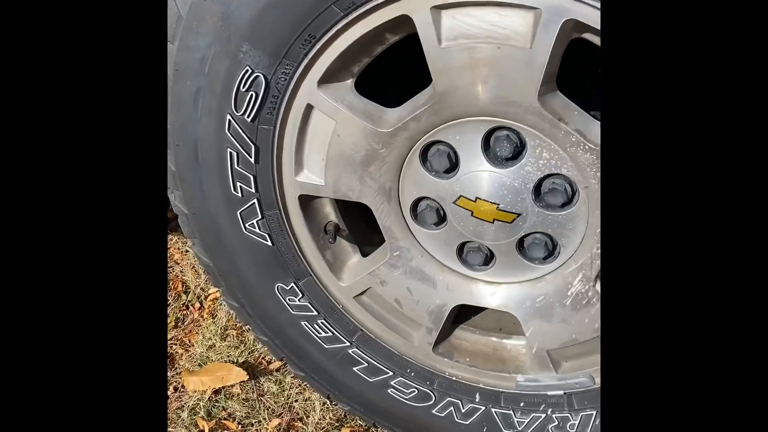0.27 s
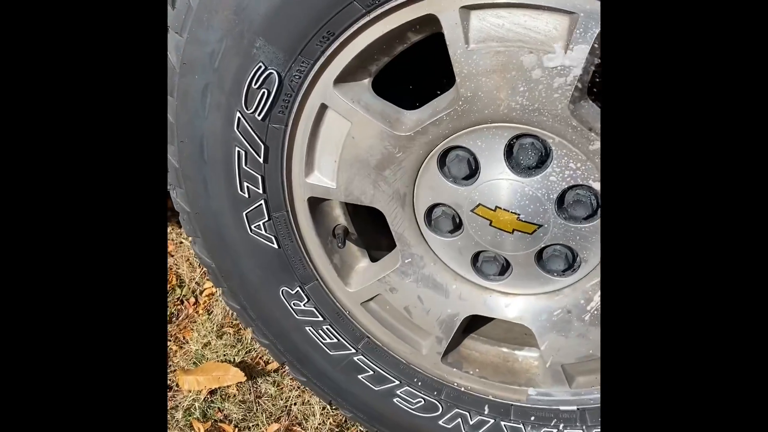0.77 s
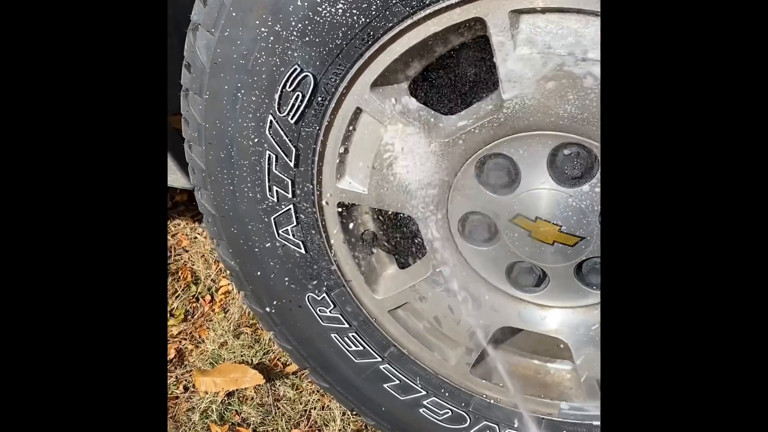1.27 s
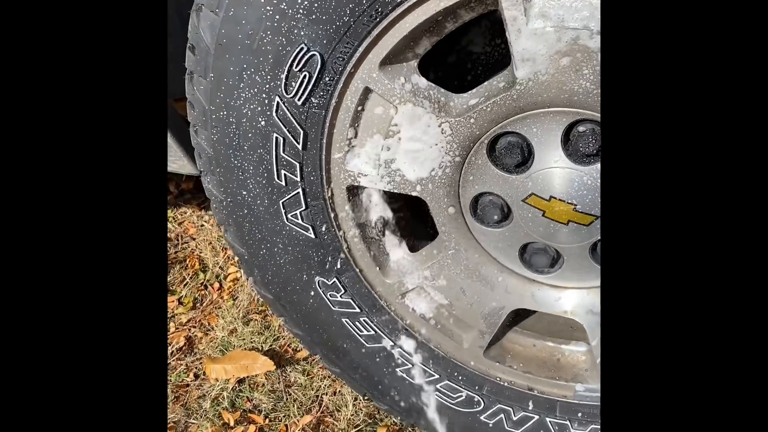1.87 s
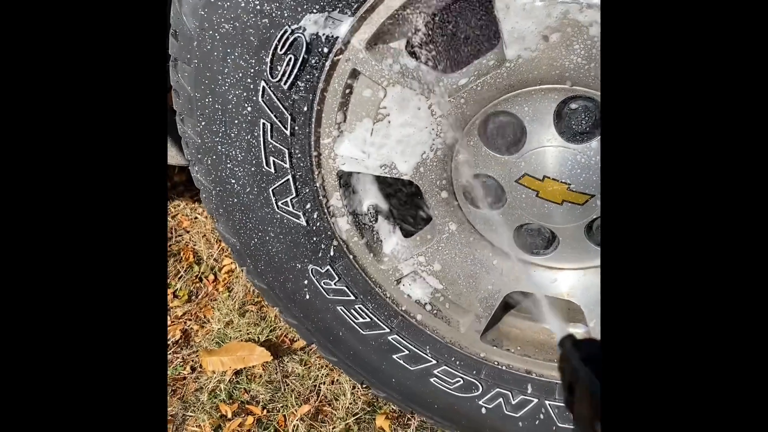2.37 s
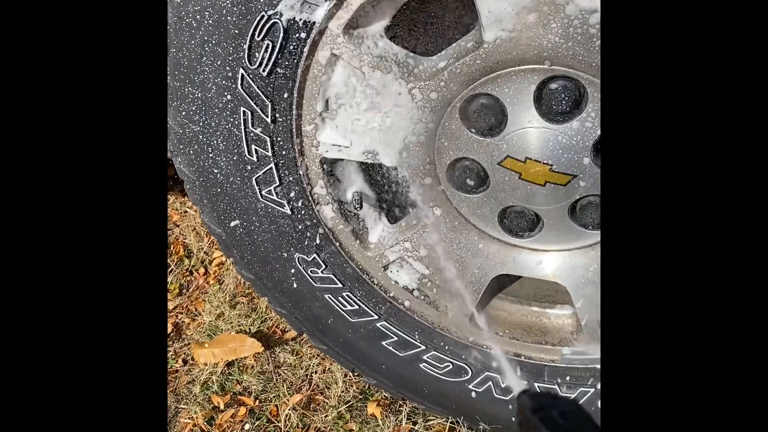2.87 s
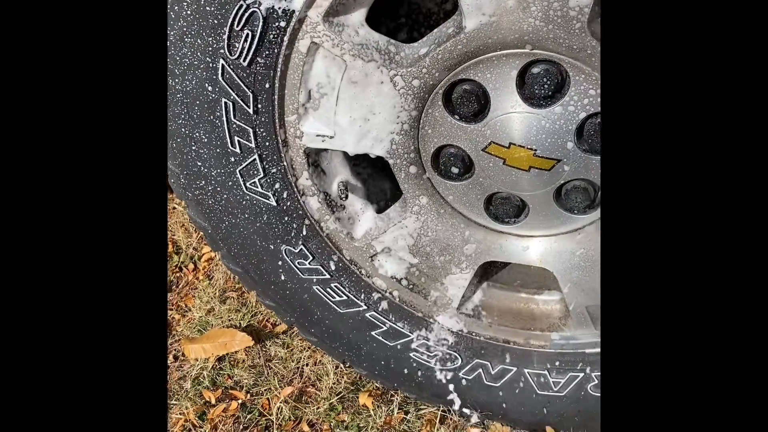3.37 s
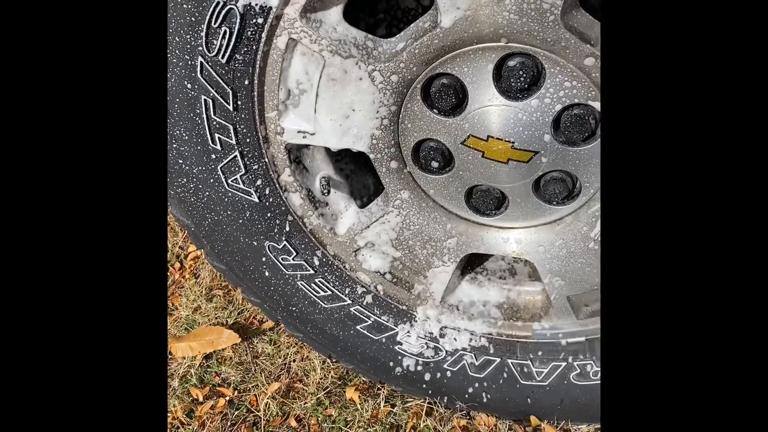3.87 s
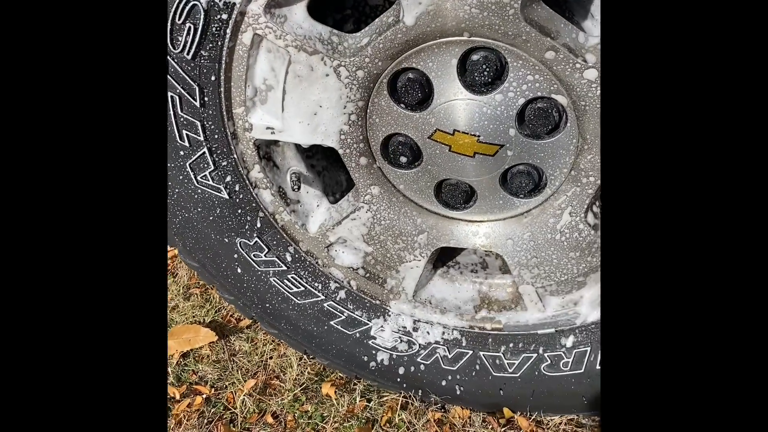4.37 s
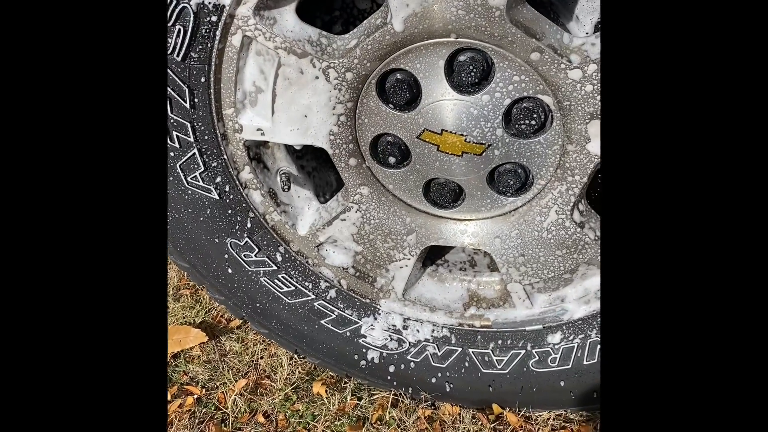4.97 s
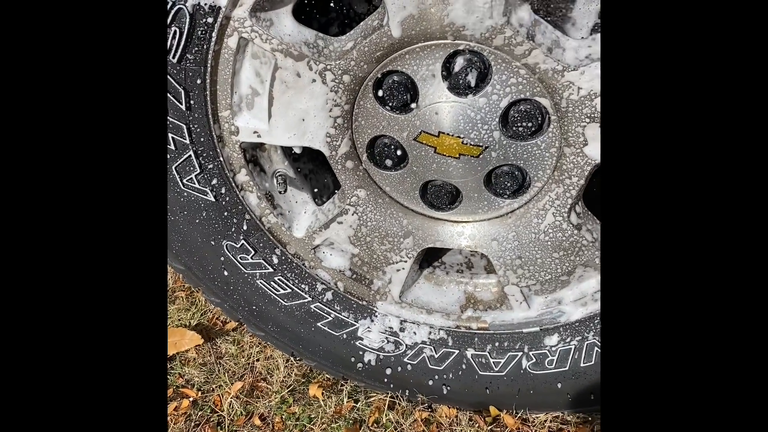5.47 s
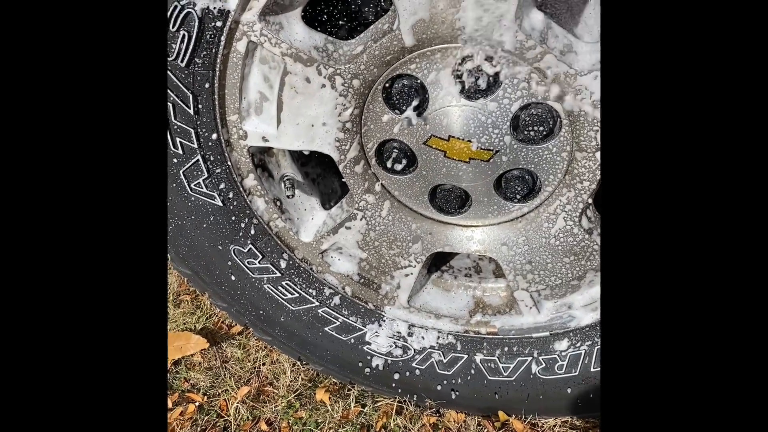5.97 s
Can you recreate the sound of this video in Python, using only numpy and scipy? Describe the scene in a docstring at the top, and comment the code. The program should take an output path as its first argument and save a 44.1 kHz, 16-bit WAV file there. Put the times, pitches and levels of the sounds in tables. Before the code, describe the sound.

Close, dry outdoor sound of a trigger spray bottle pumped at a car wheel for about 6.2 seconds. It opens already in a hiss, with wind puffs and low thumps bumping the microphone. From 0.2 s, squeezes follow steadily, about four per second: a hollow plastic clack, a few spat drops, a bright airy squirt lasting little more than a tenth of a second, then a light chattering rattle as the trigger springs back. Droplets patter on the wheel and single drops tick. The hiss is strongest around 1 s and 2.5 s. From about 3 s a distant vehicle rumble grows, with tyres singing faintly near 3.5 s, and deep surges between 4.5 and 5.5 s. Squirts soften somewhat around 5.3 s, turning more sizzly while the trigger rattles get clearer, then recover. At about 6.15 s the hand rubs the bottle with a short squeak.

```python
"""Outdoors on dry grass, microphone close: a trigger spray bottle squirts a car wheel about four times a second.
From the start the hiss swells with the finger's pressure, over air, wind puffs, low thumps and a far rumble.
Each later squeeze adds a plastic clack and a few spat drops; small rattles follow as the trigger returns.
Around three and a half seconds tyres sing faintly far off; the rumble, likely a distant vehicle, grows and surges.
At the end the hand rubs squeakily on the bottle. Noise makes hiss and wind, decaying sines ring the plastic."""
import sys
import numpy as np
from scipy import signal
from scipy.fft import rfft, irfft, next_fast_len
from scipy.io import wavfile

SR = 44100
rng = np.random.default_rng(int(sys.argv[2]) if len(sys.argv) > 2 else 0)


def inscribe(sig):
    """Save sig as 16-bit PCM at rate SR to the path in sys.argv[1].

    A 1-D sig is mono; a 2-D sig holds one channel per row.
    Samples are clipped to [-1, 1] before scaling.
    """
    pcm = np.round(np.clip(np.atleast_2d(sig).T, -1, 1) * 32767)
    wavfile.write(sys.argv[1], SR, pcm.astype(np.int16))


N = 274213
SIZE = next_fast_len(N, real=True)
TIME = np.arange(N) / SR
FREQ = np.arange(SIZE // 2 + 1) * SR / SIZE


def from_db(db):
    """Decibels to gain."""
    return 10 ** (np.asarray(db) / 20)


def rms_one(x):
    """Scale to unit rms."""
    return x / np.sqrt(np.mean(x ** 2) + 1e-20)


def in_time(rows):
    """Each column of a curve, at every sample."""
    s, *columns = np.transpose(rows)
    return [np.interp(TIME, s, column) for column in columns]


def over_freq(points):
    """A table joined on a log-frequency axis."""
    hz, value = np.transpose(points)
    return np.interp(np.log(FREQ + 1), np.log(hz), value)


def filtered(x, response):
    """Apply a gain given at every frequency."""
    return irfft(rfft(x, SIZE) * response, SIZE)[..., :N]


def band(x, low_hz, high_hz):
    """The part of a sound between two soft edges; neighbouring bands add up to the whole."""
    below_high = 1 / (1 + (FREQ / high_hz) ** 12)
    below_low = 1 / (1 + (FREQ / low_hz) ** 12)
    return filtered(x, below_high - below_low)


def drift(rate_hz):
    """Smooth random wandering of rms 1."""
    return rms_one(filtered(rng.standard_normal(N), 1 / (1 + (FREQ / rate_hz) ** 2)))


def noise(spectrum, likeness, grain_db=0):
    """Coloured stereo noise of rms 1; grain makes it a stream of unequal tiny impacts."""
    sizes = from_db(grain_db * np.minimum(rng.exponential(1, N), 6))
    mid, side = rfft(rng.standard_normal((2, N)) * sizes, SIZE)
    alike = np.clip(over_freq(likeness), -1, 1)
    pair = np.sqrt(1 + alike) * mid + np.sqrt(1 - alike) * side * [[1], [-1]]
    low_hz, high_hz = spectrum[0][0], spectrum[-1][0]
    edges = np.minimum(FREQ / low_hz, 1) ** 3 / np.maximum(FREQ / high_hz, 1) ** 3
    colour = from_db(over_freq(spectrum))
    return rms_one(irfft(pair * edges * colour, SIZE)[:, :N])


def swells(rows):
    """A bell-shaped gain for each short event."""
    return sum(from_db(db) * np.exp(-2 * ((TIME - s) / length_s) ** 2) for s, length_s, db in rows)


def step(t, rise_s):
    """A smooth step from 0 to 1, halfway at time zero."""
    return .5 + .5 * np.tanh(t / (2 * rise_s))


def taps(times, level_db):
    """One impulse per contact."""
    out = np.zeros(N)
    out[np.round(times * SR).astype(int)] = from_db(level_db)
    return out


def dying(hits, t60, rise_s=0.00016):
    """Each impulse starts a quick rise and an exponential decay."""
    rise = np.exp(-1 / (rise_s * SR))
    decay = from_db(-60 / (t60 * SR))
    return signal.lfilter([1 - rise], np.convolve([1, -rise], [1, -decay]), hits + 1e-18)


# sound from the bottle reaches the left port first: pitch_hz, lead_rad
BOTTLE_PHASE = [(0,0),(2300,0),(3100,2),(4300,1.2),(5500,.8),(6400,2.7),(7200,3.14),(8100,3.4),(9800,6.2),(11400,6.5),(12700,9.35),(14300,9.5),(15300,11.7),(16500,12.4)]


def from_bottle(pair):
    """The two microphone ports hear the bottle's treble out of step."""
    phase = np.interp(FREQ, *np.transpose(BOTTLE_PHASE))
    return np.array([filtered(pair[0], np.exp(1j * phase)), pair[1]])


# every squirt: the valve opens, the pressure arches with the finger, the valve shuts, a thin mist dies away
VALVE_LEAD_S, VALVE_S, BUILD_S, HALF_FLOW_INSET_S = 0.013, 0.0024, 0.0095, 0.006
ARCH_DB, MIST_DB, MIST_FALL_DB_PER_S = 2.5, -21.5, 130


def squirt(start_s, length_s, shut_s, lean_db):
    """The valve cracks open, the jet builds, leans with the finger and collapses into mist."""
    t = TIME - start_s
    opened = step(t + VALVE_LEAD_S, VALVE_S) * step(t - HALF_FLOW_INSET_S, BUILD_S)
    shut = step(t - length_s + HALF_FLOW_INSET_S, shut_s)
    travel = np.clip(2 * t / length_s - 1, -1, 1)
    pressure = from_db(lean_db * travel - ARCH_DB * travel ** 2)
    mist = from_db(MIST_DB - MIST_FALL_DB_PER_S * np.maximum(t - length_s, 0))
    return opened * ((1 - shut) * pressure + shut * mist)


def off_the_wheel(pair, echo_db=-9, delay_s=0.0026, sway_s=0.00051, sway_hz=2.34):
    """The wheel echoes the hiss; the path wanders at random as the hand moves, so the colour shifts."""
    earlier = TIME - delay_s - sway_s * drift(sway_hz)
    echo = np.array([np.interp(earlier, TIME, side) for side in pair])
    return pair + from_db(echo_db) * echo


# squeezes of the trigger, levels before each layer's own gain:
# clack_s, jet_delay_s (after the clack), jet_length_s, collapse_s, hiss_db, lean_db (towards the end),
# body_db (hollow bottle), crack_db (sharp crack), body_hz, crack_hz
STROKES = [(-0.045, 0.00016, 0.16, 0.0053, -26, -0.5, -19.5, -30, 1125, 2200),
           (0.2115, 0.003, 0.14, 0.0085, -24, 2, -37, -46, 1125, 1490),
           (0.4735, -0.0082, 0.13, 0.0093, -23.5, 0, -38, -36.5, 1380, 1740),
           (0.6768, 0.02, 0.13, 0.0062, -22.5, -2.5, -27.5, -30.5, 1120, 2170),
           (0.9141, 0.014, 0.12, 0.0059, -21.5, -1, -23.5, -29.5, 1145, 2120),
           (1.127, 0.022, 0.13, 0.01, -22.5, -3, -26.5, -27.5, 1124, 2050),
           (1.358, 0.019, 0.12, 0.011, -24, -4, -21.5, -32.5, 1140, 1820),
           (1.569, 0.019, 0.13, 0.0045, -25, -0.5, -25.5, -34, 1120, 2000),
           (1.802, 0.018, 0.12, 0.011, -23, 2, -26.5, -32.5, 1115, 2070),
           (2.032, 0.02, 0.13, 0.0029, -23.5, -2, -29.5, -37, 1140, 2200),
           (2.254, 0.013, 0.14, 0.0096, -23.5, 1, -23.5, -29, 1124, 2430),
           (2.5162, -0.0098, 0.12, 0.015, -20.5, 2.5, -40, -33.5, 1220, 2070),
           (2.729, 0.018, 0.14, 0.008, -22.5, -1, -22.5, -33.5, 1110, 2400),
           (2.967, 0.0047, 0.11, 0.016, -23, 3.5, -46, -37, 1120, 2180),
           (3.192, 0.015, 0.13, 0.0068, -26, -1, -30.5, -33, 1115, 2210),
           (3.41, 0.012, 0.14, 0.01, -26, 1, -28.5, -35, 1090, 2480),
           (3.653, 0.013, 0.13, 0.01, -26.5, 1, -28, -31.5, 1130, 2420),
           (3.876, 0.017, 0.12, 0.015, -24.5, 1, -29, -31, 1160, 2280),
           (4.105, 0.005, 0.098, 0.023, -24.5, 7.5, -28.5, -32.5, 1180, 2590),
           (4.3402, 0.017, 0.14, 0.0073, -24.5, -2.5, -28.5, -33.5, 1180, 2320),
           (4.616, -0.0098, 0.14, 0.0056, -25.5, 0.5, -33, -37, 1130, 2040),
           (4.836, 0.016, 0.14, 0.0083, -26, -1.5, -24, -33, 1160, 2410),
           (5.087, 0.015, 0.14, 0.0043, -27, -1.5, -25, -30, 1103, 2200),
           (5.321, 0.02, 0.13, 0.0032, -29, -4, -27, -29.5, 1140, 2230),
           (5.5443, 0.02, 0.14, 0.015, -29.5, 1.5, -29, -32.5, 1120, 2180),
           (5.794, 0.024, 0.14, 0.0081, -26, -3.5, -23, -34, 1170, 2370),
           (6.042, 0.014, 0.14, 0.012, -24.5, 1.5, -27.5, -30.5, 1150, 2460)]
# colour of the nozzle hiss: pitch_hz, density_db (per Hz)
JET = [(700,-30),(1500,-20),(2800,-15),(4000,-11),(5000,-6.8),(6200,-4.6),(6700,-2.5),(7300,-3.7),(8300,-1),(9200,0),(10000,-1.8),(11000,-4.7),(12500,-3.7),(14300,-4.8),(15600,-3)]
# stereo likeness of the hiss: pitch_hz, left_right_likeness
JET_LIKENESS = [(2000,.7),(3500,.3),(4700,.4),(6000,.75),(7000,.98),(7800,.98),(8800,.8),(10500,.92),(12000,.8),(13000,.98),(14200,.98),(15500,.75)]
# the hiss changes colour as the nozzle is aimed about: time_s, lower_hiss_db, top_sizzle_db
AIM = [(0,-3,-0.5), (2.2,-1.5,-1.5), (3.6,-1.5,-1), (4.3,-5.5,-0.5), (5.1,0,-1), (5.4,6.5,6), (6.2,3,-0.5)]
# coarse blobs of foam splatter on the rim and the tyre: time_s, level_db (within the flow)
SPLATTER = [(0,-19), (0.6,-26), (1.3,-24.5), (2.2,-22.5), (3.3,-18.5), (4.2,-19), (5.1,-28), (5.4,-28),
            (6.2,-34)]
# colour of the splatter: pitch_hz, density_db (per Hz)
SPLATTER_COLOUR = [(1800,-1.5), (2700,-3), (3400,-5), (3850,4), (4400,-7)]
# colour of drops landing on the wheel: pitch_hz, density_db (per Hz)
SPLASH = [(500,-11),(1100,25.5),(2300,16.5),(4000,19.5),(5700,35.5),(7500,-29),(10000,15),(16000,-9)]
# stereo likeness of open air, shared by splashes and the far road: pitch_hz, left_right_likeness
AIR_LIKENESS = [(60,1),(200,0.99),(400,0.8),(700,0.033),(1200,0.19),(1900,0.84),(3000,0.0097),(16000,0.04)]


def spray(jet_db=1, flutter_db=0.35, splutter_db=1.85, splash_db=-21, flight_s=0.0047, splash_growth=0.32):
    """Pressure drives a hiss that splutters as the jet breaks up; drops patter on the wheel a moment later."""
    flow = sum(from_db(hiss_db) * squirt(s + delay_s, length_s, shut_s, lean_db)
               for s, delay_s, length_s, shut_s, hiss_db, lean_db, *_ in STROKES)
    hiss = off_the_wheel(from_bottle(noise(JET, JET_LIKENESS, grain_db=1.5)))
    lower_db, top_db = in_time(AIM)
    parts = [(1, 5500, lower_db), (5500, 11000, 0), (11000, SR, top_db)]
    # each band splutters on its own
    hiss = sum(band(hiss, low_hz, high_hz) * from_db(db + splutter_db * drift(25))
               for low_hz, high_hz, db in parts)
    jet = flow * from_db(jet_db + flutter_db * drift(200)) * hiss

    splatter_db, = in_time(SPLATTER)
    splatter_gain = from_db(splatter_db + 1.15 * drift(69))
    splatter = flow * splatter_gain * noise(SPLATTER_COLOUR, AIR_LIKENESS, grain_db=6.5)

    # the pattering follows the flow late, with its swells flattened
    landing = np.interp(TIME - flight_s, TIME, flow / flow.max()) ** splash_growth * flow.max()
    clumps = from_db(1.7 * drift(31))   # foam arrives in uneven blobs
    patter = from_db(splash_db) * landing * clumps * noise(SPLASH, AIR_LIKENESS, grain_db=6.5)
    return jet + splatter + patter


ENGINE_HZ, ENGINE_DB = 66.2, -7.5   # mean firing tone; mean level against the deep rumble


def engine_hum(waver_hz=1.58, waver_rate=4, throb_db=2, throb_rate=7):
    """The firing tone of the engine, unsteady in pitch and strength."""
    turn = 2 * np.pi * np.cumsum(ENGINE_HZ + waver_hz * drift(waver_rate)) / SR
    return from_db(ENGINE_DB + throb_db * drift(throb_rate)) * rms_one(np.sin(turn))


# tyres sing on the far road, their pitch rising a little and then sinking: time_s, pitch_hz, level_db
TYRE_SONG = [(2.85,1540,-70), (3.12,1535,-48), (3.27,1590,-47.5), (3.53,1602,-44.5), (3.68,1585,-51.5),
             (3.88,1490,-46.5), (4.2,1470,-55), (4.7,1406,-67)]


def tyre_song(width_hz=60, waver_hz=20, waver_db=2, waver_rate=9):
    """A narrow band of noise that follows the pitch of the tread and wavers on its way through the air."""
    hz, level_db = in_time(TYRE_SONG)
    turn = 2 * np.pi * np.cumsum(hz + waver_hz * drift(waver_rate)) / SR
    gain = from_db(level_db + waver_db * drift(waver_rate))
    return gain * (drift(width_hz) * np.cos(turn) + drift(width_hz) * np.sin(turn))


# the distant vehicle draws near, levels before the trims below: time_s, deep_db, upper_db, growl_db
APPROACH = [(0,-36.5,-38,-31.5), (1.6,-36.5,-40.5,-37), (2.5,-34,-38.5,-36.5), (2.75,-36,-41,-44),
            (2.92,-31.5,-35,-46), (3.2,-29,-29.5,-43), (3.8,-29,-27.5,-40), (4.05,-29,-30.5,-35.5),
            (4.6,-24.5,-29,-27.5), (5.3,-25.5,-30,-29), (5.7,-27.5,-35,-27), (6.22,-27,-34.5,-32.5)]
# colour of the deep rumble, and of the thud in the low swells: pitch_hz, density_db (per Hz)
DEEP = [(22,-36),(32,-25),(45,-5),(57,0),(66,1),(76,-0.5),(100,0),(125,-11.5)]
# colour of the upper rumble and growl: pitch_hz, density_db (per Hz)
UPPER = [(80,-2.5),(115,1),(170,-5.5),(240,-10.5),(340,-22.5),(600,-34.5)]
# far road hiss: time_s, level_db
ROAD = [(0,-52),(2.8,-43.5),(3.2,-42.5),(3.6,-40),(4.1,-40),(4.6,-43.5),(6.2,-53.5)]
# colour of the road hiss: pitch_hz, density_db (per Hz)
ROAD_COLOUR = [(450,2),(650,7),(850,3.5),(970,7),(1150,8),(1360,3),(1480,5),(1800,-1.5),(2600,-2.5),(4000,-4.5)]
RUMBLE_SWAY_DB, RUMBLE_SWAY_HZ = 1.45, 31   # the rumble rises and sinks at random


def vehicle(deep_db=-1.35, upper_db=-1.0, split_hz=210):
    """Engine rumble whose bands swell on their own curves, with a faint hiss and whine of tyres, far off."""
    deep, upper, growl = (level + RUMBLE_SWAY_DB * drift(RUMBLE_SWAY_HZ) for level in in_time(APPROACH))
    road_db, = in_time(ROAD)
    body = from_db(upper_db) * noise(UPPER, AIR_LIKENESS)
    body = from_db(upper) * band(body, 1, split_hz) + from_db(growl) * band(body, split_hz, SR)
    rumble = from_db(deep + deep_db) * (noise(DEEP, AIR_LIKENESS) + engine_hum()) + body
    road = from_db(road_db) * noise(ROAD_COLOUR, AIR_LIKENESS)
    return rumble + road + tyre_song()


# colour of the open air: pitch_hz, density_db (per Hz)
AIR = [(100,8),(300,4.5),(500,-0.5),(700,0.5),(950,2.5),(1400,-7.5),(2000,-9),(3500,-14),(7000,-41),(16000,-19)]
# short low swells, wind puffs early and surges of the rumble later: centre_s, length_s, flutter_db, thud_db
LOW_SWELLS = [(0.071,0.033,-29.5,-23), (0.133,0.029,-32,-25.5), (0.24,0.02,-38,-28),
              (0.336,0.016,-29.5,-28), (0.807,0.04,-30.5,-30), (1,0.02,-29.5,-24), (1.054,0.026,-27.5,-39),
              (1.097,0.022,-26.5,-48), (1.278,0.034,-33,-28.5), (2.511,0.033,-32.5,-42),
              (2.671,0.024,-29.5,-33), (3.765,0.026,-38,-22), (4.2,0.071,-44,-25), (4.288,0.03,-29,-40),
              (4.485,0.056,-40,-23), (4.628,0.032,-36,-26), (5.12,0.04,-34,-24), (5.669,0.025,-42,-20)]
# colour of the flutter: pitch_hz, density_db (per Hz)
FLUTTER_COLOUR = [(45,3),(130,3),(200,5),(330,-4),(470,-8.5),(800,-23)]
# stereo likeness of the low swells: pitch_hz, left_right_likeness
SWELL_LIKENESS = [(40,1),(150,0.87),(500,0.96)]


def outdoors(air_db=-42):
    """Steady air, and short low swells of noise: wind puffs early, surges of the rumble later."""
    air = from_db(air_db) * noise(AIR, AIR_LIKENESS)
    flutter_gain = swells([(s, length_s, db) for s, length_s, db, _ in LOW_SWELLS])
    thud_gain = swells([(s, length_s, db) for s, length_s, _, db in LOW_SWELLS])
    flutter = flutter_gain * noise(FLUTTER_COLOUR, SWELL_LIKENESS)
    thud = thud_gain * noise(DEEP, SWELL_LIKENESS)
    return air + flutter + thud


# short low thumps: jolts at the microphone, the clack's recoil, and late heaves of the rumble:
# centre_s, pitch_hz, peak_db
THUMPS = [(.0065,147,-18), (0.042,130,-21.5), (0.0706,174,-12.5), (0.0759,200,-19.5), (0.09,79.4,-17.5),
          (0.1411,260,-25.5), (0.156,280,-27), (0.2297,110,-24.5), (.241,190,-26), (0.329,110,-28),
          (0.3444,260,-21), (0.359,80,-23), (0.7868,169,-22), (0.805,119,-21), (0.916,87.5,-19.5),
          (0.9908,217,-18), (1.037,129,-18.5), (1.0845,300,-23), (1.1027,220,-20.5), (1.276,298,-22.5),
          (1.938,85,-18), (2.6714,248,-22), (4.636,100,-30), (5.115,65,-10), (5.371,78,-11), (5.446,68,-12)]


def thumps():
    """Each thump is a single low pulse with a smaller swing the other way on either side."""
    out = np.zeros(N)
    for s, hz, db in THUMPS:
        u = (np.pi * hz * (TIME - s)) ** 2
        out -= from_db(db) * (1 - 2 * u) * np.exp(-np.minimum(u, 50))
    return out


# single bright ticks of drops, between and during squirts: start_s, level_db
DROPS = [(0.139,-30),(0.209,-32),(.473,-33),(0.845,-29),(0.924,-28),(1.131,-30),(1.545,-31),(2.039,-23.5),(2.668,-23),(3.362,-26),(3.59,-23),(3.603,-26),(3.822,-25.5),(4.273,-24),(4.777,-28),(5.111,-24),(5.3212,-26),(5.335,-28)]
# wisps that leak ahead of a squirt: centre_s, length_s, level_db
WISPS = [(.428,0.044,-41.5),(2.475,0.052,-39.5),(3.172,0.026,-36),(4.575,0.037,-46.5),(6.02,0.038,-42)]
# colour of drops and wisps: pitch_hz, density_db (per Hz)
DRIBBLE = [(1200,-6),(2500,4),(5000,13),(9500,11.5),(15000,-8)]


def dribble(drop_t60=0.012, rough_db=3):
    """Single drops tick brightly, and ragged wisps leak from the nozzle as the finger takes up the slack."""
    s, db = np.transpose(DROPS)
    drops = dying(taps(s, db), drop_t60)
    wisps = swells(WISPS) * from_db(rough_db * drift(150))
    return (drops + wisps) * from_bottle(noise(DRIBBLE, JET_LIKENESS, grain_db=6.0))


def clacks():
    """Time, body level, crack level, body pitch and crack pitch of the squeezes after time zero."""
    columns = np.transpose([row for row in STROKES if row[0] > 0])
    return columns[0], *columns[-4:]


def ringing(table, times, levels, pitches, detune, build_cycles):
    """Each contact rings the modes of a part, every mode with a strength and a slight detuning of its own."""
    out, t = np.zeros(N), TIME[:SR // 12]
    ratio, mode_db, t60 = np.transpose(table)[:, :, None]
    for s, db, pitch in zip(*np.broadcast_arrays(times, levels, pitches)):
        strength_db, bend = rng.standard_normal((2, *ratio.shape))
        hz = pitch * ratio * np.exp(detune * bend)
        envelope = from_db(db + mode_db + strength_db - 60 * t / t60)
        build = 1 - np.exp(-t * hz / build_cycles)
        modes = envelope * build * np.sin(2 * np.pi * hz * t)
        at = round(s * SR)
        out[at:at + len(t)] += modes.sum(axis=0)[:N - at]
    return out


# colour of the snap of hard plastic: pitch_hz, density_db (per Hz)
SNAP = [(850,6),(1200,9),(1800,0),(2300,-0.5),(3200,7.5),(4500,5),(6500,1),(9000,-4),(16000,-19)]
# stereo likeness of the bottle's knocks: pitch_hz, left_right_likeness
SNAP_LIKENESS = [(1000,0.64),(2100,0.64),(3200,0.053),(5000,0.38),(9000,1)]


def snap(hits, t60, rattle_db, rattle_t60):
    """The dry crack of hard plastic, with a faint rattle after it."""
    envelope = dying(hits, t60) + from_db(rattle_db) * dying(hits, rattle_t60)
    return envelope * from_bottle(noise(SNAP, SNAP_LIKENESS))


# modes of the hollow bottle: multiple of the lowest pitch, level_db, t60_s
BOTTLE = [(1,-1,.032),(1.11,-7.5,0.017)]
# modes of the spray head: multiple of the lowest pitch, level_db, t60_s
HEAD = [(1,3.5,.014),(1.14,-3,.012),(1.36,-4.5,.012),(1.95,-3,.009)]
# how freely the grip lets the spray head ring at a squeeze: time_s, gain_db
HEAD_RING = [(0,9), (1.2,-2.5), (2.2,5), (4.4,-8), (5.3,11.5), (6.2,6.5)]


def squeezes(body_gain_db=6.0, body_lag_s=0.00036, snap_db=10, slip_s=0.0011, slip_db=-11):
    """The trigger slips, then hits its stop: a dry snap, a crack of the spray head, a knock of the bottle."""
    s, body_db, crack_db, body_hz, crack_hz = clacks()
    head_db = crack_db + np.interp(s, *np.transpose(HEAD_RING))
    hits = taps(s, crack_db + snap_db) + taps(s - slip_s, crack_db + snap_db + slip_db)
    dry_snap = snap(hits, t60=0.005, rattle_db=-15.5, rattle_t60=0.29)
    crack = ringing(HEAD, s, head_db, crack_hz, detune=0.037, build_cycles=1)
    knock = ringing(BOTTLE, s + body_lag_s, body_db + body_gain_db, body_hz, detune=.012, build_cycles=1.1)
    return dry_snap + crack + knock


# the trigger springs back or rattles in its seat: time_s, level_db (before each layer's gain), crack_hz
RETURNS = [(0.382, -31, 2400), (0.5348, -31, 2160), (0.619, -28, 2090), (0.845, -28.5, 2100),
           (1.0763, -27.5, 2100), (1.295, -35, 2100), (1.516, -36, 2090), (1.976, -30, 2120),
           (2.1996, -29, 1700), (2.43, -29, 1790), (2.6715, -29.5, 2760), (2.903, -31.5, 1950),
           (4.2875, -29.5, 2000), (4.5145, -33, 2080), (4.781, -28.5, 2240), (5.0255, -29.5, 1900),
           (5.267, -26, 2090), (5.494, -24, 2020), (5.7287, -27.5, 2260), (5.75, -28, 2500),
           (5.978, -25.5, 2030)]
# the contacts of one return: their spacing, loss, unevenness and scatter in pitch (natural log)
CHATTER_GAP_S, CHATTER_LOSS_DB, CHATTER_UNEVEN_DB, CHATTER_DETUNE = .0017, 3, 4, .07
RETURN_BODY_HZ = 1142   # before the scatter in pitch


def returns(body_db=-6, head_db=-2.5, snap_db=-7, count=4):
    """The trigger chatters home in a few tiny contacts, so it rattles rather than rings."""
    s, db, hz = np.transpose(RETURNS)[:, :, None]
    late, weak = rng.random((len(s), 2, count)).transpose(1, 0, 2)
    contact = np.arange(count) - 1   # the second contact is the main one
    times = (s + CHATTER_GAP_S * (contact + late)).ravel()
    levels = (db - CHATTER_UNEVEN_DB * weak - CHATTER_LOSS_DB * abs(contact)).ravel()
    dry_snap = snap(taps(times, levels + snap_db), t60=0.0039, rattle_db=-15, rattle_t60=0.054)
    head = ringing(HEAD, times, levels + head_db, np.repeat(hz, count), CHATTER_DETUNE, build_cycles=1)
    body = ringing(BOTTLE, times, levels + body_db, RETURN_BODY_HZ, detune=0.065, build_cycles=0.56)
    return dry_snap + head + body


def trigger(right_db=1.05):
    """A firm clack at each squeeze and a lighter rattle at each return, a little to the right."""
    return (squeezes() + returns()) * from_db([[-right_db], [right_db]])


def spits(level_db=-4, spread_db=3, t60=0.013, count=3):
    """Just after each clack a few first drops of random size spit from the opening nozzle."""
    s, _, crack_db, _, _ = np.array(clacks())[:, :, None]
    delay, size = rng.random((len(s), 2, count)).transpose(1, 0, 2)
    times = s + 0.0048 + 0.017 * delay
    levels = crack_db + level_db - spread_db * np.log(size + 0.042)
    hits = taps(times.ravel(), levels.ravel())
    return dying(hits, t60) * from_bottle(noise(SPLASH, SNAP_LIKENESS))


# the hand rubs squeakily on the bottle: centre_s, length_s, level_db, pitch_hz
RUBS = [(6.128,.009,-24,2050),(6.145,.009,-23,2250),(6.168,.014,-30,1900),(6.194,.02,-28,1640),(6.19,.018,-28,2300),(6.185,.022,-32,2800)]


def rubs(slips_per_s=300, ring_t60=.014, uneven_db=1.5, scuff_db=-11):
    """The hand sticks and slips on the bottle; every slip rings the plastic and scuffs it."""
    out, all_slips = np.zeros(N), np.zeros(N)
    # the slip rate wanders around its middle value
    turns = np.floor(np.cumsum(slips_per_s * from_db(3 * drift(150))) / SR)
    slips = np.diff(turns, prepend=0) * from_db(uneven_db * rng.standard_normal(N))
    decay = from_db(-60 / (ring_t60 * SR))
    for s, length_s, db, hz in RUBS:
        hits = slips * swells([(s, length_s, db)])
        w = 2 * np.pi * hz / SR
        out += signal.lfilter([0, np.sin(w)], [1, -2 * decay * np.cos(w), decay * decay], hits + 1e-18)
        all_slips += hits
    scuff = dying(all_slips, ring_t60 / 2) * noise(SNAP, SNAP_LIKENESS)
    return out + from_db(scuff_db) * scuff


def scene():
    """The bottle close by, the surroundings behind it."""
    surroundings = vehicle() + outdoors()
    bottle = spray() + dribble() + trigger() + spits() + rubs()
    return bottle + thumps() + surroundings


LOW_CUT_HZ, CUTOFF_HZ = 28.6, 15780


def record(dry):
    """The microphone drops the deepest bass, and a steep low-pass closes the top."""
    low_cut = signal.butter(4, LOW_CUT_HZ, "high", fs=SR, output="sos")
    dry = signal.sosfilt(low_cut, dry)
    return filtered(dry, 1 / np.sqrt(1 + (FREQ / CUTOFF_HZ) ** 300))


dry = scene()
out = record(dry)
inscribe(out)
```